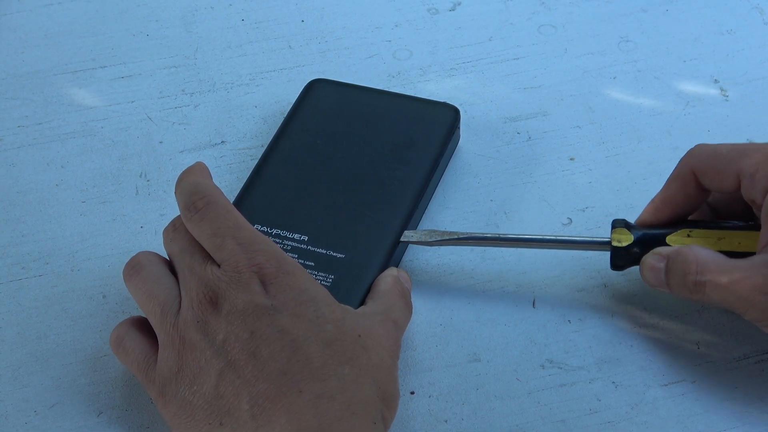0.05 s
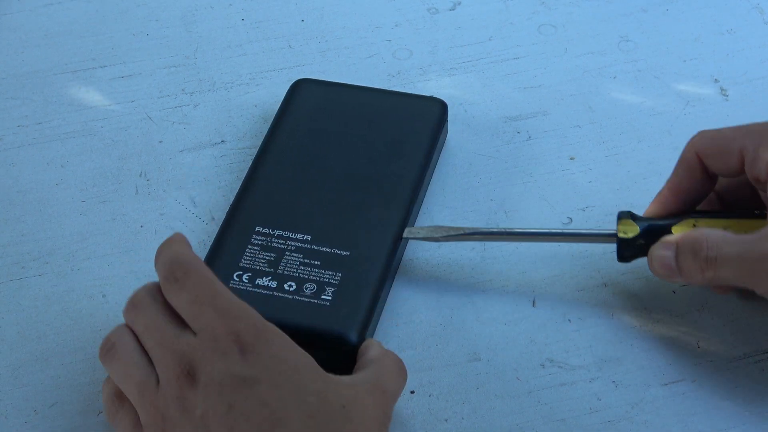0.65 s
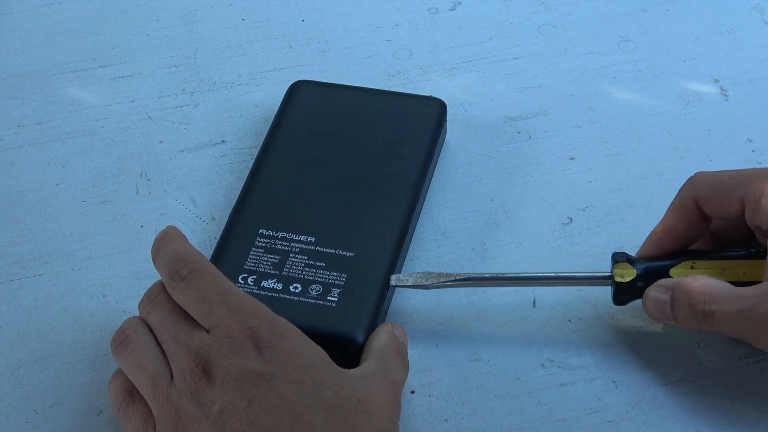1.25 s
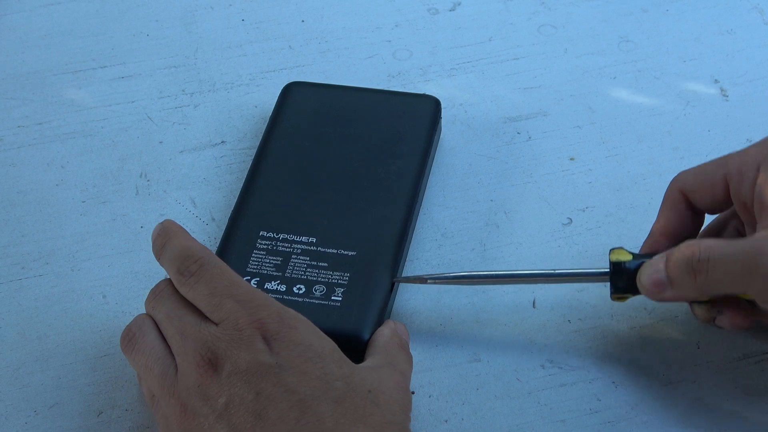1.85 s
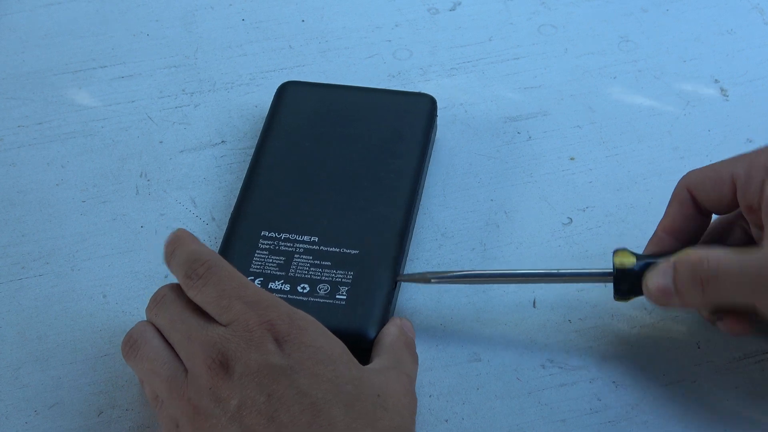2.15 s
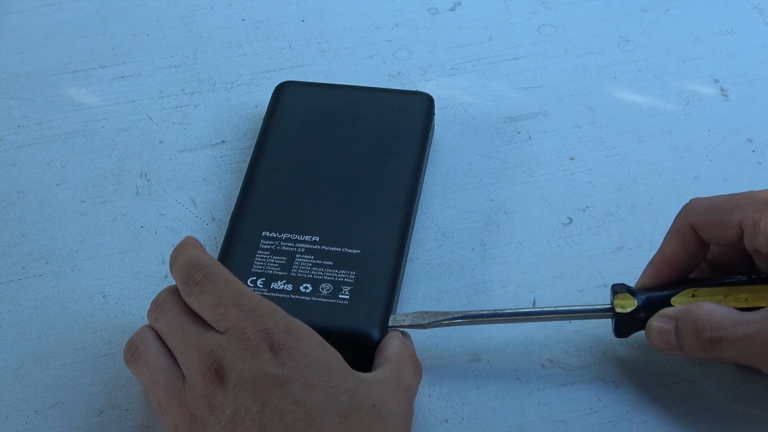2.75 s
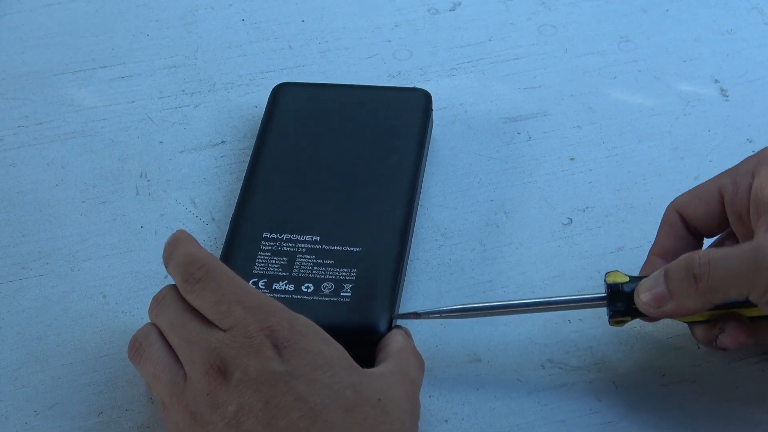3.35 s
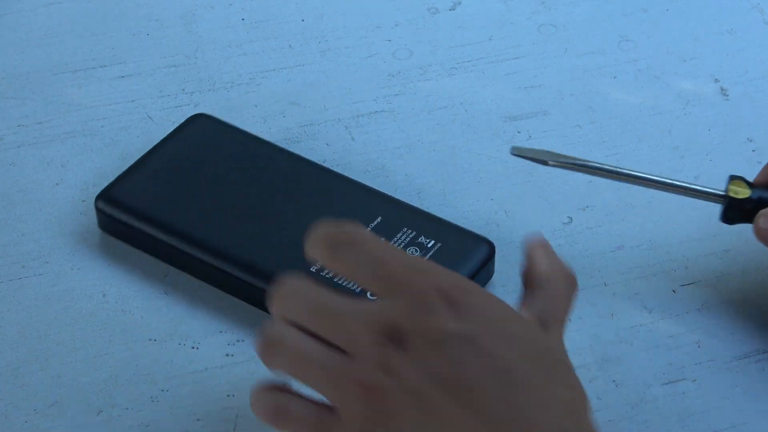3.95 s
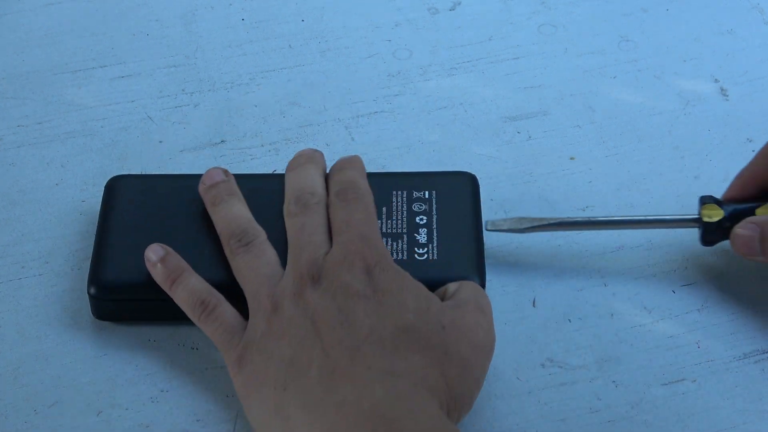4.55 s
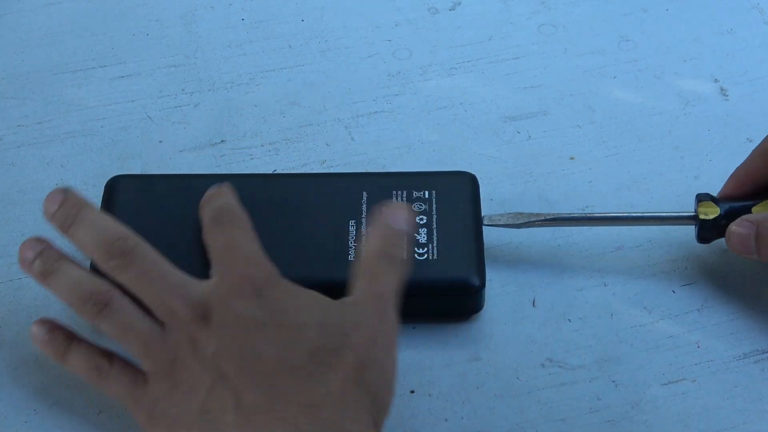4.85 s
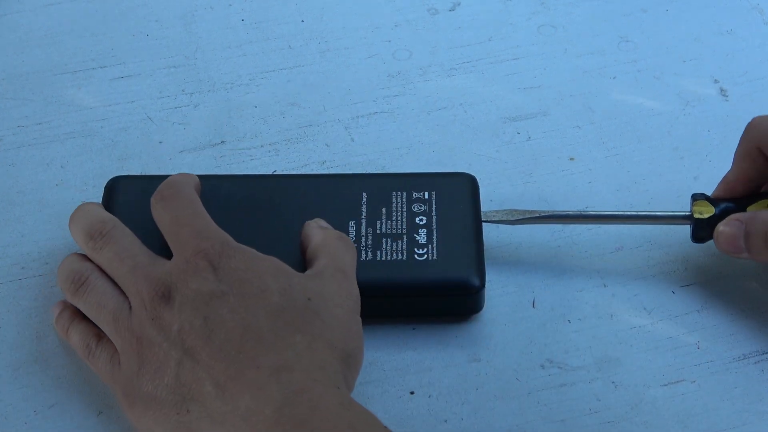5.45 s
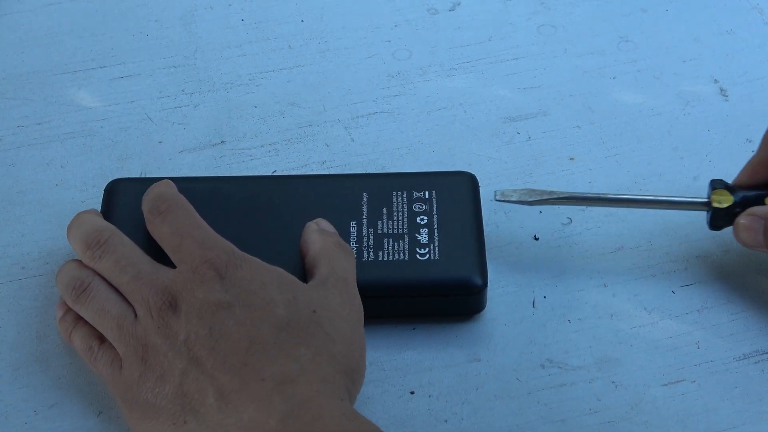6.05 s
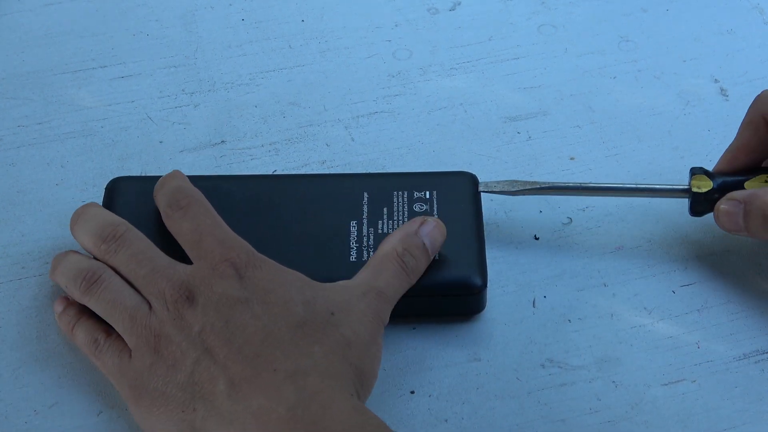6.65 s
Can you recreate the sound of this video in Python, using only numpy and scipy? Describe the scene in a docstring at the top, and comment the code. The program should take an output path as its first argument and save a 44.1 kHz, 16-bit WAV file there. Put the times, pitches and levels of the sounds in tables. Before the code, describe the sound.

A metal screwdriver blade picks at the seam of a plastic case, making close, dry ticks, clicks and small scrapes. Midway the case is dragged round on the bench with a few dull thumps. The prying resumes and the blade skids off with one loud snap, followed by another click. Behind it are a soft outdoor murmur, a distant droning engine and a faint bird near the end.

```python
"""A screwdriver pries at the seam of a plastic case on a bench: the blade ticks, scrapes and once
skids off with a loud snap. Contacts ring the damped modes of the case; tiny slips make the rubbing.
The case thumps on the bench top and is dragged round by hand to try another side.
Behind it, over an outdoor murmur, a distant engine drones and slowly sinks in pitch,
and a bird twitters faintly near the end."""
import sys
import numpy as np
from scipy import signal
from scipy.fft import rfft, irfft, next_fast_len
from scipy.io import wavfile
from scipy.ndimage import map_coordinates

SR = 44100
rng = np.random.default_rng(int(sys.argv[2]) if len(sys.argv) > 2 else 0)


def transcribe(u):
    """Save the signal u as a 16-bit wav file named by the first command-line argument.

    u: samples, shape (n,) or (channels, n), limited to [-1, 1]; the rate is SR.
    q: integer samples, one column per channel.
    """
    v = np.clip(np.atleast_2d(u).T, -1, 1)
    q = np.round(v * 32767).astype(np.int16)
    wavfile.write(sys.argv[1], SR, q)


N = 295029

# Outdoor murmur. Each row: frequency in Hz, relative spectral density in dB.
AIR_SPECTRUM = [(12, -66), (20, -16.5), (119, 1), (203, -7), (233, -6), (261, -11), (345, -10.5),
                (419, -17.5), (456, -18), (655, -15), (797, -21.5), (1890, -31.5), (2500, -33.5),
                (2720, -31), (15800, -48.5)]
# Each row: time in seconds, murmur level in dB.
AIR_LEVEL = [(0, -37), (.8, -38.5), (1.5, -37.5), (2.4, -35.5), (3.2, -35), (4.5, -34.5), (5.4, -36),
             (6.69, -35.5)]
# Each row: time in seconds, fundamental in Hz, relative level in dB.
ENGINE_TRACK = [(0, 118.7, -40), (.8, 118.3, -40.5), (1.6, 117, -36), (2.4, 114.9, -37.5),
                (3.1, 113.7, -32.5), (4, 114.6, -31.5), (4.8, 113.9, -33), (5.4, 113.7, -41.5),
                (6, 112.5, -33.5), (6.69, 110.9, -33.5)]
# Each row: multiple of the fundamental, relative level in dB.
ENGINE_HARMONICS = [(1, -1), (2, -4), (3, -10.5), (4, -22.5), (5, -18.5), (6, -43)]
# Each row: centre time in seconds, top pitch in Hz, level in dB.
BIRD_NOTES = [(6.41, 4570, -62), (6.487, 4610, -42), (6.545, 4250, -55), (6.572, 4550, -50),
              (6.65, 4550, -48), (6.672, 4100, -47)]
# Each row: frequency in Hz, t60 in seconds.
ROOM_DECAY = [(150, 0.28), (1000, 0.13), (3500, 0.17), (8000, 0.11), (15000, 0.038)]
# Shell resonances that rubbing brings out. Each row: centre in Hz, half width in Hz, lift in dB.
SHELL_RESONANCES = [(760, 81, -0.5), (1500, 99, 3.5), (3310, 390, 3.5)]
# Case on bench. Each row: frequency in Hz, relative spectral density in dB.
SLIDE_SPECTRUM = [(120, -9), (200, 2.5), (333, 0), (488, -5), (534, 1.5), (585, -7.5), (742, -2), (906, -2),
                  (1170, -13), (1450, -13), (2330, -17), (2900, -15), (4260, -20.5), (9830, -27.5),
                  (15500, -35)]
# Each row: start and length in seconds, relative peak level in dB, bass and hiss offsets in dB.
CASE_SHOVES = [ (0.505, .13, -34.5, 1, -8), (0.585, 0.13, -39, -3.5, -5), (1.64, 0.13, -44.5, 3.5, -8.5),
               (1.73, 0.12, -49, 10, -8), (3.42, 0.15, -39, 3, -9), (3.53, .2, -38, 2.5, -12.5),
               (3.645, .2, -30, 2, -8.5), (3.755, 0.14, -26.5, 2, -10), (3.865, 0.17, -39.5, 11, -9.5),
               (4.16, .12, -30.5, 3.5, -14), (4.228, 0.093, -27.5, 0, -9.5), (4.28, 0.14, -34.5, 8, -8.5),
               (4.345, 0.093, -35, 6.5, -9.5)]
# Upper modes of the bench top. Each row: frequency in Hz, relative level in dB.
BENCH_MODES = [(290, 0), (340, -16.5), (390, -5.5), (470, -11.5)]
# Each row: start in seconds, level in dB, pitch in Hz, upper-mode weight in dB, t60 in seconds.
BENCH_THUMPS = [(1.192, -17, 174, -2.5, 0.097), (1.243, -16, 146, -16, 0.078), (2.181, -15, 126, -6, 0.085),
                (2.595, -10.5, 127, 1, 0.069), (3.436, -17.5, 133, -12, 0.14),
                (3.926, -12, 146, -6.5, 0.066), (3.953, -12, 152, -7, 0.087),
                (4.155, -11.5, 133.7, -6, 0.29), (4.217, -9.5, 137, -20, 0.074),
                (4.999, -5, 140, -6, 0.085), (5.672, 0.5, 124, -31, 0.058), (5.736, -16, 190, -2, 0.099),
                (5.774, -12, 158, 0, 0.059), (5.782, -19, 200, -2, 0.066), (6.207, -17.5, 136, -2.5, 0.057),
                (6.592, -5, 151.5, -6, 0.055)]
# Blade on seam. Each row: frequency in Hz, relative spectral density in dB.
SCRAPE_SPECTRUM = [(130, -6.5), (200, 6.5), (320, -0.5), (420, -11), (580, -10), (760, -6.5), (1200, -9.5),
                   (1560, -5.5), (1950, -8), (2450, -6), (3400, -8), (4500, -12.5), (6000, -25),
                   (8500, -26), (15500, -37.5)]
# Each row: start and length in seconds, relative final level in dB, bass and hiss offsets in dB.
BLADE_PUSHES = [ (0.036, 0.011, -48, 3, -12), (0.37, 0.033, -53, 4, -9), (0.9, 0.031, -47.5, 8, -10),
                (1.166, 0.0084, -38.5, 10, -12), (1.515, .08, -51.5, 10, -20), (2.1, 0.03, -38.5, 5, -16),
                (2.18, 0.018, -36, 5.5, -10), (2.222, .028, -35.5, -8, -11), (2.35, 0.13, -49.5, 3, -12.5),
                (2.552, .055, -31, 3, -16), (2.825, 0.029, -41.5, 3, -14), (2.86, 0.058, -37, 1.5, -7),
                (3.078, 0.017, -40.5, 6, -11), (3.29, 0.0069, -35.5, 7, -12), (4.5, 0.054, -39.5, -15, -8),
                (4.62, 0.02, -37.5, 4.5, -12.5), (4.665, 0.026, -28.5, 2, -14),
                (4.712, 0.034, -24.5, -7, -14), (4.76, 0.046, -39, -7, -4), (4.81, 0.12, -40, -3, -5.5),
                (4.93, 0.059, -43.5, 1, -11), (5.145, 0.045, -43, -3, -7), (5.185, 0.065, -38, -8, -11),
                (5.305, 0.027, -47.5, 0, -18), (5.724, 0.059, -19, -1.5, -11.5),
                (5.795, 0.031, -28, -14, -15), (5.85, 0.046, -39, -12, -10), (5.91, 0.049, -40, -3, -15),
                (5.98, 0.028, -47, 2, -7), (6.283, 0.017, -32.5, -0.5, -18), (6.355, 0.024, -44, -4, -6),
                (6.5, 0.015, -33.5, 2, -14)]
# Steel tip against the rim. Each row: frequency in Hz, relative level in dB, t60 in seconds.
TIP_MODES = [(1070, -29, 0.018), (2300, -22, 0.013), (3560, -10, 0.0067), (3930, -1.5, 0.0051),
             (4470, -0.5, 0.0034), (5100, -14, 0.0055), (7500, -12, 0.0037), (9000, -18, .002),
             (12000, -17.5, 0.0025)]
# Each row: start in seconds, relative peak level in dB.
TIP_SKIPS = [(.31, -33), (.346, -23.5), (.369, -29), (.4125, -37), (0.4233, -20), (0.4278, -1.5)]
# Case with the blade on it. Each row: frequency in Hz, relative level in dB.
CASE_MODES = [(460, -0.5), (600, -8.5), (750, -1.5), (940, -3), (1120, -3), (1520, 5), (1850, 1.5),
              (2250, 2.5), (2850, 1), (3300, 2), (3550, 3.5), (4100, 0.5), (4600, 1), (5500, 0.5),
              (6500, -3.5), (7300, 5.5), (8650, 6.5), (9800, 1), (11200, -2), (13000, 5.5), (14800, -8)]
# Knock, ring and snap bands. Each row: low and high edge in Hz.
CLICK_BANDS = [(400, 1050), (1300, 4600), (5800, 13000)]
# Each row: start in seconds, ring level in dB, knock and snap offsets in dB, main resonance in Hz.
BLADE_CONTACTS = [ (0.0356, -30.5, -20, -8, 3060), (1.1834, -42.5, 11.5, -20, 831),
                  (1.191, -41, 4, -12, 1570), (1.2416, -33.5, -15, -38, 1800),
                  (1.4193, -48.5, -2, -29, 1900), (1.953, -48.5, -8, 1, 1930),
                  (1.981, -35.5, -0.5, -13, 1400), (2.101, -35.5, 2.5, -15, 736),
                  (2.1094, -36, 1, -14, 1450), (2.1213, -40, 4, -18, 1490), (2.1517, -45, 4, -3, 3220),
                  (2.1827, -40.5, 5.5, -13, 1420), (2.2539, -34, -2, -19, 1950),
                  (2.4662, -45, -4, -18, 1570), (2.539, -36, -5, -25, 2970),
                  (2.5942, -15.5, -11.5, -20, 2820), (2.7945, -45, 4.5, -24, 1010),
                  (3.0403, -46.5, 18.5, -3, 761), (3.0785, -32, -0.5, -15, 1320),
                  (3.0924, -37.5, -4, -16, 3420), (3.2902, -31.5, 3.5, -14.5, 660),
                  (3.303, -36.5, 5, -11, 1485), (3.379, -52, -6, 4, 660), (3.4102, -44, 0, -18, 3370),
                  (3.437, -33.5, 3, -17, 1130), (3.4944, -34.5, -20, -7, 3480),
                  (3.845, -28.5, -1, -12, 3195), (3.9236, -40, 11.5, -15, 860), (4.166, -47, 8, -20, 650),
                  (4.181, -31.5, -12, -10, 3580), (4.2859, -39, 13, -12, 900),
                  (4.6218, -35.5, -19, -13, 3440), (4.738, -31, -14, -28, 2370),
                  (4.9177, -39, 0, -25, 3040), (4.9988, -13.5, -4.5, -23, 980),
                  (5.2425, -33, -6, -35, 1519), (5.5642, -37.5, -35, -15, 2750),
                  (5.599, -39, -16, -12, 3404), (5.6276, -42, -21, 0.5, 3500), (5.643, -45, -13, -5, 2930),
                  (5.6643, -26.5, 3, -20, 1030), (5.6694, -25.5, 2.5, -5, 790), (5.72, -6.5, -16, -9, 1580),
                  (5.8903, -46, -16, -10, 3300), (5.92, -39.5, -20, -8, 3625),
                  (6.204, -35.5, -4.5, -30, 3280), (6.266, -39, 6.5, -22, 920),
                  (6.3964, -38.5, -4, -32, 3440), (6.5263, -34, -14, -23, 3520),
                  (6.5898, -16.5, -12.5, -19.5, 2950)]


def amp(db):
    return 10 ** (np.asarray(db) / 20)


def unit_rms(x):
    return x / np.sqrt(np.mean(x ** 2) + 1e-20)


def log_interp(points, hz):
    point_hz, values = np.transpose(points)
    return np.interp(np.log(hz + 1), np.log(point_hz + 1), values)


def curves(rows):
    """One value per sample for each column after the time."""
    times_s, *columns = np.transpose(rows)
    return [np.interp(np.arange(N) / SR, times_s, column) for column in columns]


def wobble(knots_per_s):
    """Smooth random curve."""
    return map_coordinates(rng.standard_normal(2048), [np.arange(N) * knots_per_s / SR], mode="mirror")


def filtered(x, gain_at_hz):
    size = next_fast_len(N + SR // 2)
    return irfft(rfft(x, size) * gain_at_hz(np.fft.rfftfreq(size, 1 / SR)), size)[:N]


def add(track, start_s, sound):
    part = track[max(0, round(start_s * SR)):][:len(sound)]
    part += sound[:len(part)]


def decay(t, t60_s):
    return np.exp(-np.log(1000) * t / t60_s)


def outdoor_murmur(hum_hz=80.6, hum_db=-42):
    """Traffic and air, with a low unsteady hum."""
    air = unit_rms(filtered(rng.standard_normal(N), lambda hz: amp(log_interp(AIR_SPECTRUM, hz))))
    hum_phase = 2 * np.pi * hum_hz * np.arange(N) / SR + 1.5 * wobble(4.4)
    hum = amp(hum_db + 3 * wobble(3.3)) * np.sin(hum_phase)
    return amp(curves(AIR_LEVEL)[0]) * air + hum


def far_engine(waver=0.004, fading_db=2):
    """Each harmonic fades in and out on its way through the air."""
    hz, db = curves(ENGINE_TRACK)
    phase = 2 * np.pi * np.cumsum(hz * (1 + waver * wobble(7))) / SR
    return amp(db) * sum(amp(harmonic_db + fading_db * wobble(5)) * np.sin(k * phase)
                         for k, harmonic_db in ENGINE_HARMONICS)


def far_bird(dip_hz=350, sweep_s=0.019, sigma_s=0.017, scatter_t60_s=0.04):
    """Thin arched notes, scattered on their way from afar."""
    out, t = np.zeros(N), np.arange(-SR // 16, SR // 16) / SR
    for centre_s, top_hz, db in BIRD_NOTES:
        hz = top_hz - dip_hz * (1 - np.exp(-(t / sweep_s) ** 2))
        note = np.exp(-(t / sigma_s) ** 2 / 2) * np.sin(2 * np.pi * np.cumsum(hz) / SR)
        paths = rng.standard_normal(len(t)) * decay(t - t[0], scatter_t60_s)
        add(out, centre_s + t[0], amp(db) * signal.fftconvolve(note, paths / np.linalg.norm(paths)))
    return out


def room(x, delay_s=0.004):
    """Short diffuse tail from nearby walls, different as the hands move."""
    out, block = np.zeros(N), SR // 3
    for start in range(0, N, block):
        hz, t, noise = signal.stft(rng.standard_normal(block), SR, nperseg=256)
        t60_s = log_interp(ROOM_DECAY, hz)[:, None]
        tail = signal.istft(noise * decay(t, t60_s), SR, nperseg=256)[1]
        tail /= np.linalg.norm(tail)
        add(out, start / SR + delay_s, signal.fftconvolve(x[start:start + block], tail))
    return out


def wandering_contact(x, depth_db=3.5, patch_hz=220, patch_s=0.035):
    """The contact spot wanders, so resonances come and go."""
    hz, t, spectrum = signal.stft(x, SR, nperseg=512)
    grid = np.meshgrid(hz / patch_hz, t / patch_s, indexing="ij")
    patches = map_coordinates(rng.standard_normal((128, 256)), grid, mode="mirror")
    swing_db = depth_db / (1 + hz[:, None] / 8000)  # steadier in the treble
    return signal.istft(spectrum * amp(swing_db * patches), SR, nperseg=512)[1][:N]


def stroke_gains(strokes, envelope):
    """Bass, rasp and hiss gains over time; strokes add in power."""
    power, t = np.zeros((3, N)), np.arange(SR // 2) / SR
    for start_s, length_s, db, bass_db, hiss_db in strokes:
        for track, offset_db in zip(power, (bass_db, 0, hiss_db)):
            add(track, start_s, (amp(db + offset_db) * envelope(t, length_s)) ** 2)
    return np.sqrt(power)


def friction(gains, spectrum, slips_per_s, smooth_db, judder_db, judder_per_s):
    """Tiny uneven slips over a smooth rub drive the resonances of case and bench."""
    def response(hz):
        shell_db = sum(lift_db / (1 + ((hz - centre_hz) / half_width_hz) ** 2)
                       for centre_hz, half_width_hz, lift_db in SHELL_RESONANCES)
        return amp(log_interp(spectrum, hz) + shell_db)

    slips = (rng.random(N) < slips_per_s / SR) * rng.standard_normal(N)
    drive = unit_rms(slips) + amp(smooth_db) * rng.standard_normal(N)
    drive *= amp(judder_db * wobble(judder_per_s))
    rub = filtered(wandering_contact(drive), response)
    bass = unit_rms(filtered(rub, lambda hz: hz < 1200))
    rasp = unit_rms(filtered(rub, lambda hz: (hz >= 1200) & (hz < 5000)))
    hiss = unit_rms(filtered(rub, lambda hz: hz >= 5000))
    return np.sum(gains * [bass, rasp, hiss], axis=0)


def case_slides(skew=0.7, speed_exponent=0.68):
    """Shoved over the bench, the case speeds up quickly and coasts to a stop."""
    def shove(t, length_s):
        speed = np.abs(np.sin(np.pi * np.minimum(t / length_s, 1) ** skew))
        return speed ** speed_exponent

    return friction(stroke_gains(CASE_SHOVES, shove), SLIDE_SPECTRUM,
                    slips_per_s=2400, smooth_db=0, judder_db=1.5, judder_per_s=110)


def bench_thumps(attack_s=0.0027, upper_t60_s=0.11, upper_trim_db=-4.5):
    """Bumped by the case, the bench top swings at a pitch set by where it is pressed."""
    out, t = np.zeros(N), np.arange(SR // 3) / SR
    attack = 1 - np.exp(-t / attack_s)
    upper = sum((-1) ** k * amp(db) * np.sin(2 * np.pi * hz * t) * decay(t, upper_t60_s)
                for k, (hz, db) in enumerate(BENCH_MODES))
    for start_s, db, hz, upper_db, t60_s in BENCH_THUMPS:
        swing = np.sin(2 * np.pi * hz * t) * decay(t, t60_s)
        add(out, start_s, amp(db) * attack * (swing + amp(upper_db + upper_trim_db) * upper))
    return out


def blade_scrapes(bite_s=0.0026, build_db=10, release_t60_s=0.097):
    """The blade bites, is pressed ever harder along the seam, then lets go."""
    def push(t, length_s):
        bite = 1 - np.exp(-t / bite_s)
        pressure = amp(build_db * (np.minimum(t / length_s, 1) - 1))
        return bite * pressure * decay(np.maximum(t - length_s, 0), release_t60_s)

    return friction(stroke_gains(BLADE_PUSHES, push), SCRAPE_SPECTRUM,
                    slips_per_s=2000, smooth_db=-2, judder_db=0.4, judder_per_s=130)


def tip_skips(gain_db=1, contact_s=0.00012):
    """The tip skips over the rim of the seam: dry bright ticks that barely move the case."""
    out, t = np.zeros(N), np.arange(SR // 32) / SR
    tick = sum(amp(db) * np.sin(2 * np.pi * hz * t) * decay(t, t60_s) for hz, db, t60_s in TIP_MODES)
    tick *= 1 - np.exp(-t / contact_s)  # the plastic yields
    for start_s, db in TIP_SKIPS:
        add(out, start_s, amp(db + gain_db) * tick / np.abs(tick).max())
    return out


def case_ring(t, t60_s, knock_db, detune=0.029, scatter_db=3.5, damping_exponent=0.22):
    """Damped case modes; the spot struck shifts their pitch and strength."""
    mode_hz, mode_db = np.transpose(CASE_MODES)
    shift, strength, polarity = rng.standard_normal((3, len(CASE_MODES)))
    hz = mode_hz * (1 + detune * shift)
    mode_t60_s = t60_s * (2000 / hz) ** damping_exponent
    ring_band_hz = CLICK_BANDS[1]
    octaves = np.log2(np.clip(hz, *ring_band_hz) / np.mean(ring_band_hz))
    tilt_db = 0.01 * knock_db * octaves
    gains = np.sign(polarity) * amp(mode_db + tilt_db + scatter_db * strength)
    return gains @ (np.sin(2 * np.pi * hz[:, None] * t) * decay(t, mode_t60_s[:, None]))


def blade_clicks(base_t60_s=0.0099, snap_db_per_halving=26.5, crunch_db=4, main_q=4.2, rms_span_s=0.01):
    """The blade crunches on the plastic and rings the case; sharp contacts are short, dull ones hollow."""
    out, t = np.zeros(N), np.arange(SR // 16) / SR
    bandpasses = [signal.butter(3, edges_hz, "band", fs=SR, output="sos") for edges_hz in CLICK_BANDS]
    for start_s, ring_db, knock_db, snap_db, main_hz in BLADE_CONTACTS:
        t60_s = base_t60_s * 2 ** (-snap_db / snap_db_per_halving)
        click = case_ring(t, t60_s, knock_db)
        click += amp(crunch_db) * rng.standard_normal(len(t)) * decay(t, 0.92 * t60_s)
        hollow_db = -1 - 0.4 * snap_db
        click += amp(hollow_db) * signal.lfilter(*signal.iirpeak(main_hz, main_q, fs=SR), click)
        for sos, offset_db in zip(bandpasses, (knock_db, 0, snap_db)):
            band = signal.sosfilt(sos, click)
            band *= np.sqrt(SR * rms_span_s) / np.linalg.norm(band)
            add(out, start_s, amp(ring_db + offset_db) * band)
    return out


def scene():
    """Blade, case and bench close by, the rest far off."""
    rubs = amp(0.5) * blade_scrapes() + amp(-0.5) * case_slides()
    clicks, skips, thumps = blade_clicks(), tip_skips(), bench_thumps()
    reverb = room(amp(-14.5) * clicks + amp(-17) * skips + amp(-13) * (thumps + rubs))
    distant = far_engine() + outdoor_murmur() + far_bird()
    return (clicks + skips + thumps + rubs + reverb + distant)[None]


def record(dry):
    """Full-scale clipping of the sharpest snaps, then a steep low-pass."""
    cutoff_hz = 16000
    return filtered(np.clip(dry[0], -1, 1), lambda hz: 1 / (1 + (hz / cutoff_hz) ** 80))[None]


dry = scene()
out = record(dry)
transcribe(out)
```